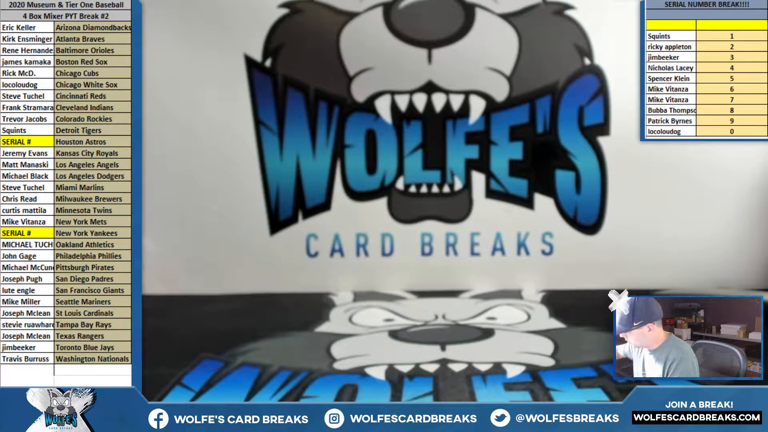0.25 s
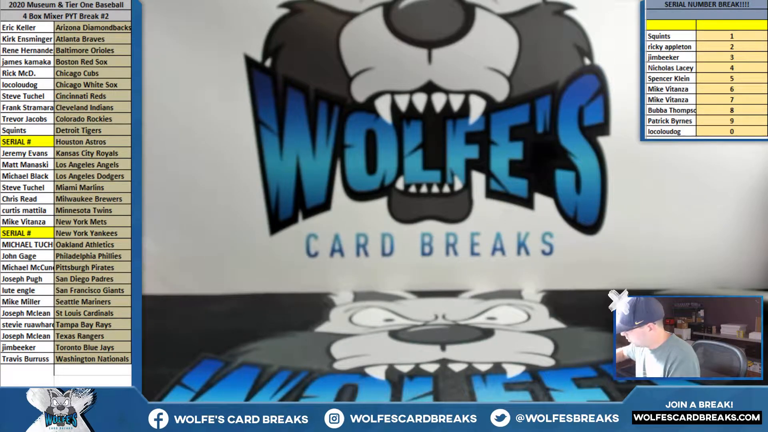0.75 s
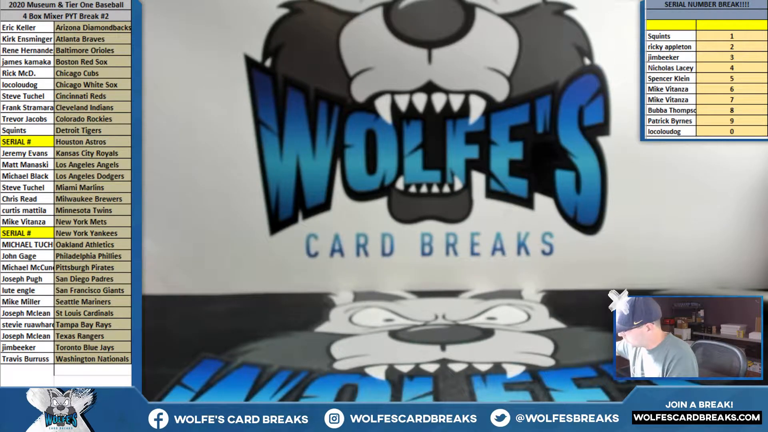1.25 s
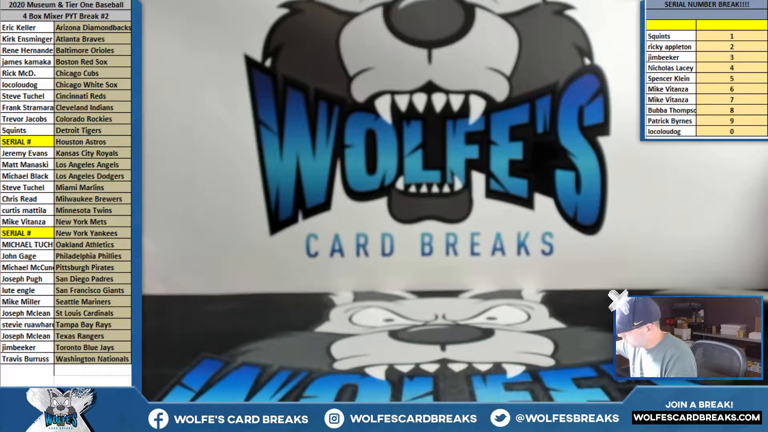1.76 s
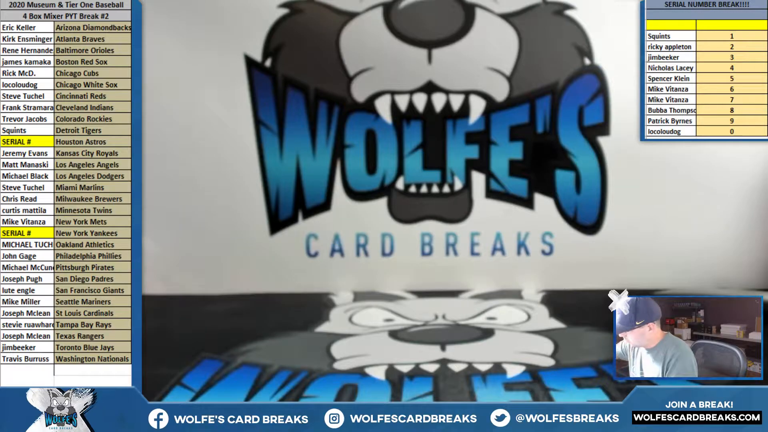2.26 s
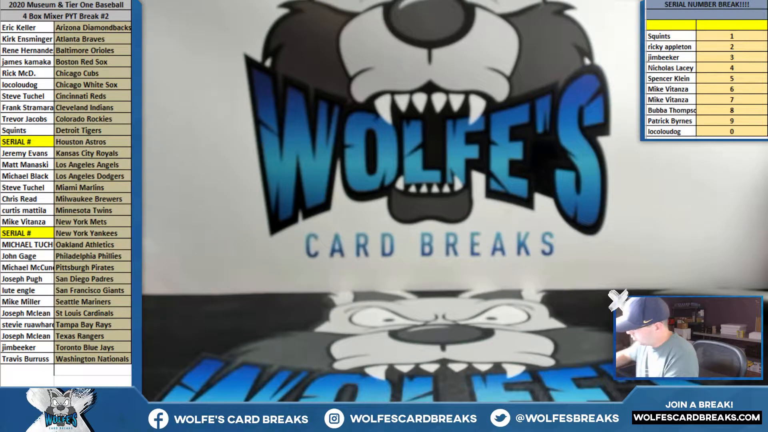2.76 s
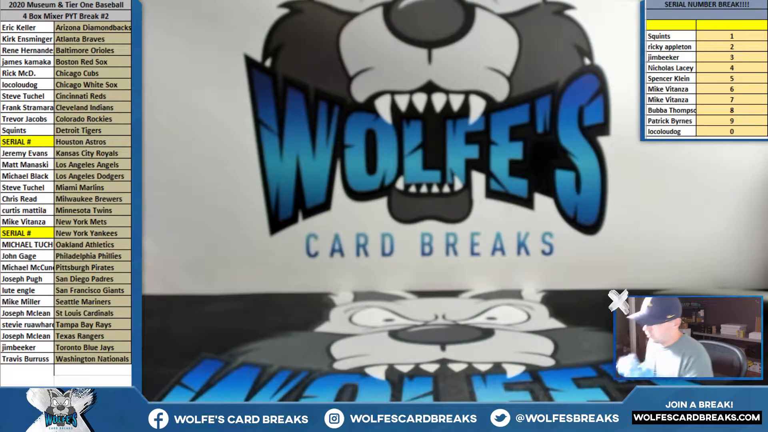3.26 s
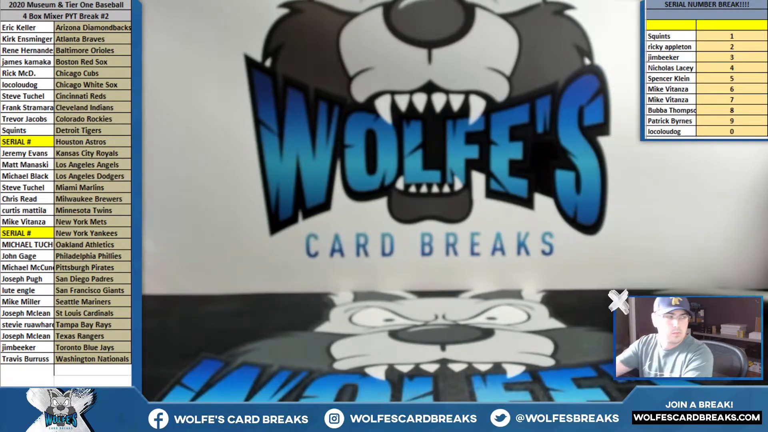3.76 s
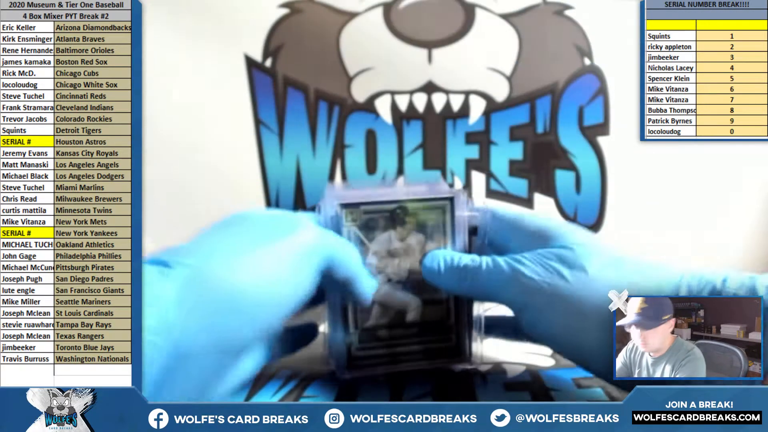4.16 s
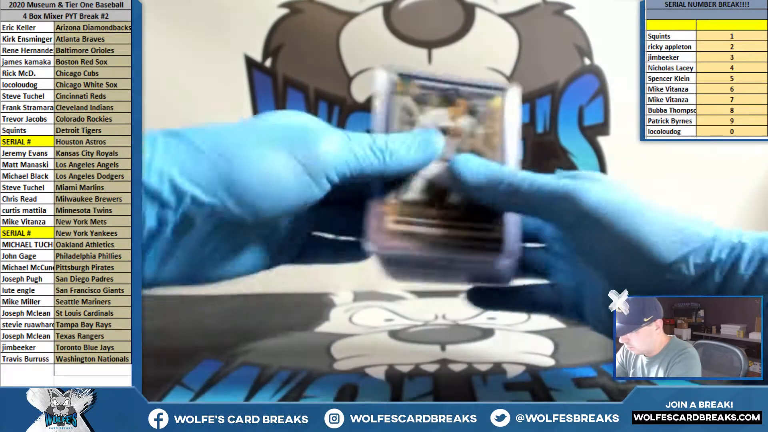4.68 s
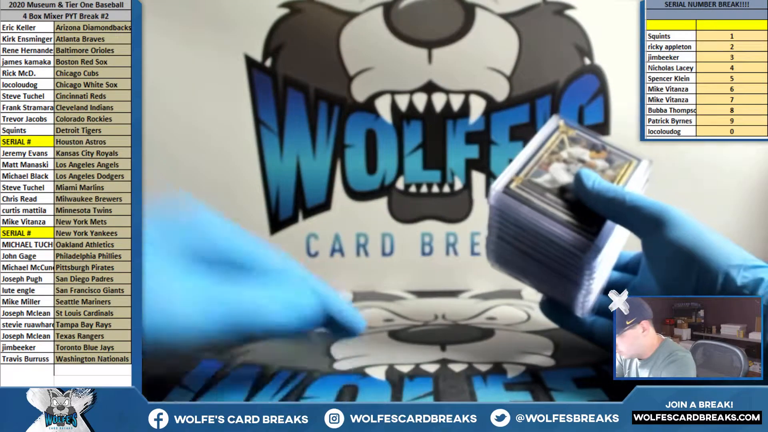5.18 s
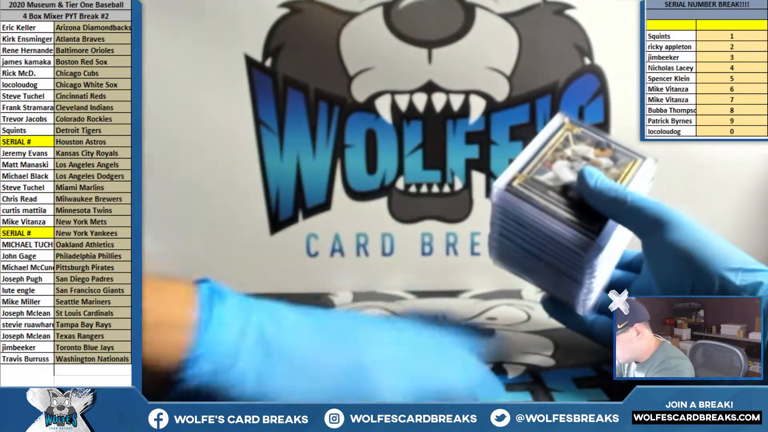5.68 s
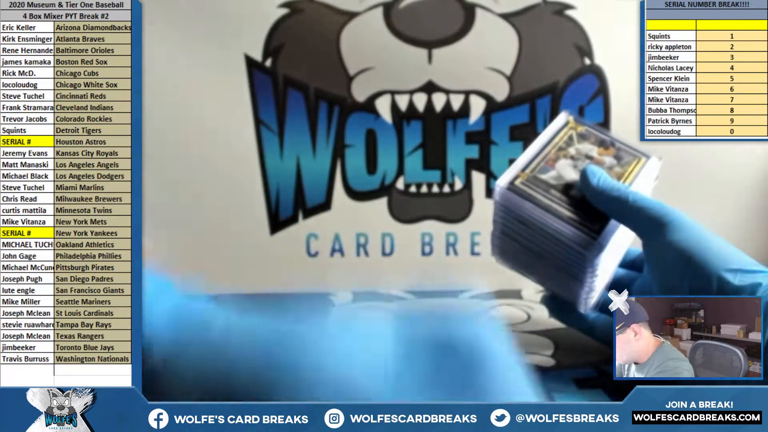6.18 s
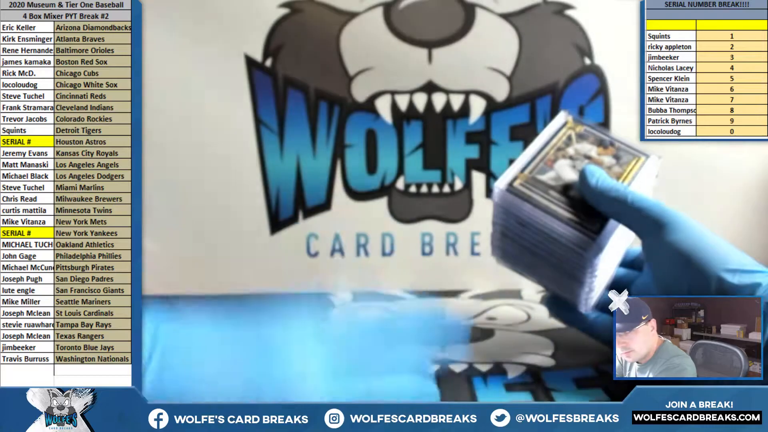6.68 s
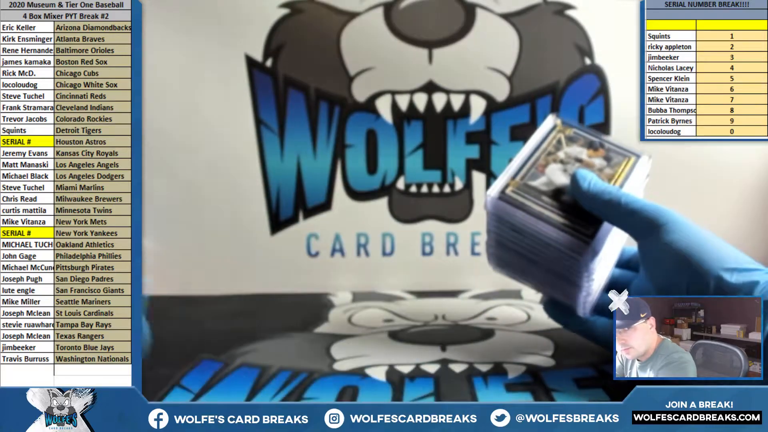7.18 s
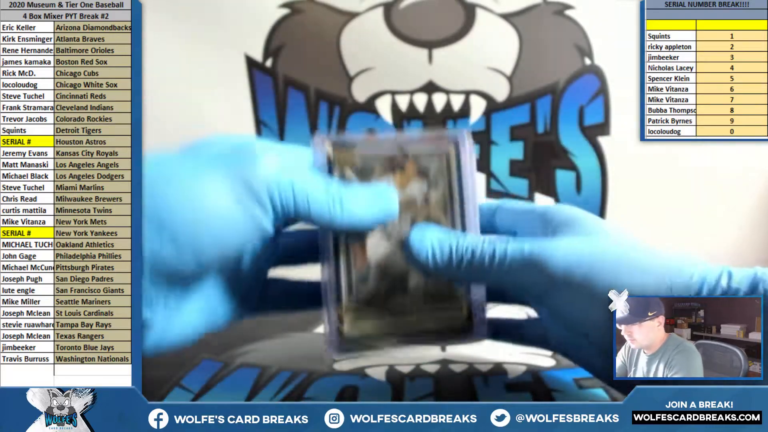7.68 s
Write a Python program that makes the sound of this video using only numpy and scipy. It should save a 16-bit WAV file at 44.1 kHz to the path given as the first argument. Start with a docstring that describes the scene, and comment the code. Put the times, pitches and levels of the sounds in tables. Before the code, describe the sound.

Over a faint fan hum, gloves rustle softly and stiff plastic card holders clack against a desk in a few scattered knocks. A card slips from its sleeve with a short rising zip. Later the holders are laid down one after another and slid across a cloth mat, each with a hiss, a click and a thump, while the desk rumbles deeply. The microphone stands close by in a small room.

```python
"""A faint fan hum and the soft rustle of gloves come first; then plastic card holders clack on a desk.
The stiff holders ring as they are knocked together and stacked, and a small room echoes each clack.
A card leaves its sleeve with a short rising zip. Later the holders are laid down one by one and slid
aside, hissing on a cloth mat. Blows thump the desk top, and the whole desk sways on its legs with a
deep rumble. Everything is heard up close, through a microphone standing on the desk."""
import sys
import numpy as np
from scipy import signal
from scipy.fft import rfft, irfft, next_fast_len
from scipy.io import wavfile
from scipy.ndimage import uniform_filter1d, map_coordinates

SR = 44100
rng = np.random.default_rng(int(sys.argv[2]) if len(sys.argv) > 2 else 0)


def log_audio(samples):
    """Write samples as a 16-bit WAV file to the path given in sys.argv[1]."""
    # one column per channel
    frames = np.atleast_2d(samples).T
    # limit to full scale, then quantise
    limited = np.clip(frames, -1, 1)
    pcm = np.round(limited * 32767).astype(np.int16)
    wavfile.write(sys.argv[1], SR, pcm)


N = 350133

# Tone of the room's air noise: pitch_hz, level_db
AIR_TONE = [(21, -38), (35, -12.5), (77, -14), (95, -24), (227, -15), (258, -25), (454, -25.5), (930, -38),
            (1270, -37), (1370, -40.5), (1810, -40.5), (2400, -66), (16000, -54)]
# Steady rubbing of gloves and sleeves: time_s, fine_db, dull_db
RUSTLE_LEVELS = [(0.0, -90.5, -83.5), (0.99, -85, -82), (1.3, -82, -78.5), (1.9, -82, -80),
                 (2.33, -79, -78), (2.44, -64, -56), (2.6, -66, -60), (2.75, -71, -68), (2.85, -78, -72),
                 (3.45, -76.5, -80), (3.7, -85, -82.5), (3.98, -83.5, -79), (4.2, -70, -67.5),
                 (4.6, -73, -78), (5.2, -76.5, -79), (6.0, -75.5, -78), (6.4, -72, -72.5),
                 (7.25, -75, -76.5), (7.54, -76.5, -78.5), (7.94, -67, -63.5)]
# Soft scuffs of a glove or sleeve: start_s, fade_s, fine_db, dull_db
# (every fade_s is the time a sound takes to drop by 60 dB)
SCUFFS = [(0.463, 0.23, -67.5, -58.5), (0.622, 0.18, -68.5, -99), (0.913, 0.069, -71, -87),
          (1.15, 0.38, -60, -60), (1.22, 0.13, -67, -65), (1.47, 0.44, -77, -72.5),
          (2.355, 0.095, -56.5, -55), (2.455, 0.31, -60, -65), (3.35, 0.095, -66, -87),
          (4.018, 0.23, -66, -70), (4.15, 0.18, -64, -53.5), (4.38, 0.67, -70, -70),
          (5.42, 0.073, -59.5, -78), (6.52, 0.22, -79, -91), (7.433, 0.1, -58, -61)]
# Tone of the fine rustle of soft plastic sleeves: pitch_hz, level_db
FINE_RUSTLE_TONE = [(1760, -29), (3000, -8), (5000, -5), (7500, -2), (10000, -9), (13500, -10),
                    (15800, -15)]
# Tone of the dull rustle: pitch_hz, level_db
DULL_RUSTLE_TONE = [(400, -50), (700, -13), (1050, -3.5), (1300, -1.5), (1840, 0.5), (2700, -1),
                    (3700, -6.5), (6000, -14), (10000, -82)]
# The rising note of a card leaving its sleeve: time_s, pitch_hz, level_db
ZIP_PATH = [(2.39, 2100, -75), (2.43, 3190, -62), (2.47, 5160, -59), (2.505, 6300, -57), (2.53, 7000, -78)]
# Pushes that set the desk swaying: start_s, rocking_db, shaking_db
DESK_PUSHES = [(0.0, -51, -69.5), (0.3, -56.5, -78), (0.72, -74, -78), (0.97, -57, -75), (1.5, -55, -68.5),
               (2.02, -61, -58.5), (2.3, -51.5, -58), (4.05, -59, -57), (4.36, -53, -57.5),
               (4.981, -46.5, -54), (5.241, -33, -49.5), (5.6, -41, -45), (5.75, -35.5, -46.5),
               (5.98, -33.5, -43.5), (6.32, -34, -43), (6.76, -29, -42.5), (6.97, -33.5, -43.5),
               (7.45, -41, -48), (7.76, -46, -43.5)]
# A holder slides over the mat: start_s, length_s, level_db
SLIDES = [(4.824, 0.17, -45.5), (5.216, 0.17, -47), (5.574, 0.22, -47), (5.948, 0.22, -46),
          (6.29, 0.24, -48.5), (6.607, 0.22, -48), (6.94, 0.19, -47.5)]
# Tone of a slide's bright hiss: pitch_hz, level_db
HISS_TONE = [(1500, -34), (2500, -4), (4400, -4.5), (5300, -6), (6800, -1), (7700, -1), (11300, -8),
             (13600, -5), (14700, -10), (15800, -13)]
# Tone of a slide's main scrape: pitch_hz, level_db
SCRAPE_TONE = [(900, -5), (1500, 1.5), (2000, 1), (2700, -8.5), (3700, -2.5), (6000, -13), (10000, -55)]
# Tone of the shorter scrape at the start of a slide: pitch_hz, level_db
SHORT_SCRAPE_TONE = [(500, -43), (900, -16.5), (1400, -5.5), (1900, 10.5), (3000, 1)]
# Notes the desk top rings at with no hand on it: pitch_hz, level_db, fade_s
DESK_NOTES = [(87.86, -3, 1), (98, 7.5, 0.14), (111.7, 3, 0.4), (126.5, 8.5, 0.075), (144, 2, 0.49),
              (162, 3, 0.14), (188.1, 2, 0.2), (220.8, -2, 0.36), (251.3, -3, 0.48), (279, 1, 0.33),
              (356.2, 2.5, 0.25), (395, 9, 0.12), (449.5, -3.5, 0.29), (542.5, 3, 0.16), (655, -3.5, 0.14)]
# Blows on the desk top: start_s, level_db, pitch_hz, hardness_db
THUMPS = [(0.501, -67, 128, -4), (0.974, -40.5, 204, -4), (0.995, -33.5, 169, -3.5),
          (1.039, -34.5, 151, -14), (1.156, -45.5, 137, 5.5), (2.019, -27, 212, -6.5),
          (2.049, -25, 193, -10), (2.296, -39.5, 154, -20), (2.325, -44, 143, -29), (2.351, -42, 144, -23),
          (2.386, -44.5, 142, -17), (2.458, -43.5, 84, 3), (2.777, -44.5, 127, -10), (3.126, -50.5, 85, -9),
          (3.375, -54, 137, -5), (4.043, -38, 140, -29), (4.049, -28.5, 173, -12.5), (4.073, -30, 98, -19),
          (4.134, -32, 208, -10), (4.151, -34, 103, 2), (4.173, -32.5, 122, -9), (4.194, -37.5, 95.6, -4.5),
          (4.238, -37.5, 139, -15.5), (4.367, -44, 107, -4.5), (4.839, -40, 113, -16.5),
          (4.869, -40, 101, -27), (4.979, -46, 90, -23), (5.233, -29.5, 105, -24), (5.583, -27.5, 184, -22),
          (5.605, -28.5, 118, -17.5), (5.642, -41, 96, -22), (5.744, -39, 140, -18), (5.956, -33, 146, -12),
          (5.975, -27.5, 113, -28), (6.111, -32.5, 100, -21.5), (6.312, -30, 133, -12.5),
          (6.359, -37, 87, -27), (6.46, -43.5, 86.1, -26), (6.623, -22.5, 104.5, -13.5),
          (6.743, -30.5, 85.5, -25.5), (6.948, -28.5, 115.6, -13), (6.976, -35.5, 86.1, -15),
          (7.072, -34, 89, -18), (7.109, -41, 140, -20), (7.754, -30, 104, -36), (7.816, -30, 133, -7),
          (7.826, -30.5, 131, -8.5), (7.837, -26, 114, -16.5), (7.884, -37, 89, -23)]
# How long the room echoes, from low to high: pitch_hz, fade_s
ROOM_FADE = [(500, 0.46), (1500, 0.26), (4000, 0.28), (8000, 0.22), (15000, 0.15)]
# Tone of the treble in a plastic crack: pitch_hz, level_db
CRACK_TONE = [(500, -42), (2500, -1), (6500, 1), (10000, -5.5), (16000, -9.5)]
# Notes a stack of holders rings at: pitch_hz, width_hz, level_db
HOLDER_NOTES = [(914, 220, 9.5), (1225, 61, 12.5), (1405, 100, 2), (1615, 110, 7), (1822, 120, -9),
                (2156, 150, 3), (2310, 210, -3.5), (2610, 450, 3.5), (3150, 420, -26.5), (3820, 450, -1.5),
                (4800, 510, -34), (5650, 160, 3.5), (7750, 850, -9)]
# Holder edges knock together: start_s, level_db, pitch_hz, treble_db
CLACKS = [(0.97, -35, 1300, -11), (0.9744, -22.5, 1480, -11.5), (0.9801, -20, 1570, -10),
          (1.0019, -25.5, 1690, -11.5), (1.15, -35, 2170, -39), (1.1735, -35, 1470, -28),
          (1.2253, -39.5, 1670, -19), (2.0149, -33, 2770, -16), (2.0204, -24.5, 2680, -13.5),
          (2.0271, -23.5, 1250, -12.5), (2.038, -29.5, 5900, 0), (2.3086, -51.5, 1360, -10.5),
          (2.4559, -31, 2070, -39), (2.4654, -33, 1850, -23), (2.781, -48.5, 1000, -21),
          (2.9592, -49.5, 1500, -3), (3.1261, -51.5, 2700, -9), (3.376, -45, 1000, -5),
          (3.381, -47.5, 5040, -11), (3.6445, -56, 1920, -8), (4.048, -30, 2100, -22.5),
          (4.0757, -41, 1220, -21), (4.16, -48, 1580, -23), (4.1692, -35.5, 2170, -11),
          (4.1892, -48, 1540, -18), (4.216, -47.5, 3320, -28), (4.368, -23.5, 2700, -14),
          (4.562, -50.5, 3640, -13), (4.715, -47.5, 7100, -6), (4.831, -50, 2190, -29),
          (4.8423, -39.5, 1640, -18), (5.0783, -49, 1280, -2), (5.2212, -40.5, 1730, -15),
          (5.232, -29, 2070, -13), (5.5734, -43, 1780, -28), (5.5868, -28, 1800, -14),
          (5.649, -36.5, 1980, -21), (5.947, -46, 1920, -25), (5.9611, -35.5, 1960, -18.5),
          (6.309, -44, 2400, -23), (6.541, -48, 3000, -25), (6.6148, -46, 1420, -28),
          (6.6243, -28.5, 1600, -39), (6.864, -50, 3000, -31), (6.9494, -33.5, 1530, -23),
          (6.9529, -31, 1760, -30), (6.959, -37, 1580, -28), (7.0745, -41, 1600, -24.5),
          (7.4448, -48, 4500, -10), (7.486, -46, 4300, -23), (7.594, -51, 1630, -6),
          (7.6506, -50, 1580, -10), (7.7526, -44, 2360, -7), (7.777, -43, 1250, -11),
          (7.8162, -40.5, 1820, -33), (7.8247, -40.5, 2000, -26), (7.9013, -36.5, 1780, -17),
          (7.907, -38, 1700, -15)]

ROCK_HZ, LOW_ROCK_HZ, SHAKE_HZ = 26.5, 20, 68
SWAY_LOSS_DB_PER_S, SWAY_BUILD_S = (8, 3), 0.06  # the two losses: rocking, shaking
TICKS_PER_S, TICK_FADE_S = 18, 0.007
HAND_DAMPING = 0.71  # share of the desk's ring time left under a resting hand
STACK_NEAR_S = 4.0  # from here on the stack is gripped and close to the microphone
ROOM_FAR_DB, ROOM_NEAR_DB = -22.5, -32
CHATTER_LOOSE, CHATTER_GRIPPED = 0.42, 0.22
TOP_HZ = 15740


def amp(db):
    """Turn decibels into a gain to multiply by."""
    return 10 ** (np.asarray(db) / 20)


def unit(x):
    """Scale x to an average power of 1."""
    return x / np.sqrt(np.mean(x ** 2) + 1e-20)


def along(points, hz):
    """Read a table of pitch_hz, value at any pitch, blending between its rows."""
    pitches, values = np.transpose(points)
    return np.interp(np.log(hz + 1), np.log(pitches + 1), values)


def curves(rows, outside=None):
    """Turn each column after the time into one value per sample."""
    times, *columns = np.transpose(rows)
    return [np.interp(np.arange(N) / SR, times, column, outside, outside) for column in columns]


def wobble(rate):
    """A smooth curve through `rate` random values a second."""
    return map_coordinates(rng.standard_normal(int(N * rate / SR) + 4), [np.arange(N) * rate / SR])


def rough_noise(tone, grain_db, patchy_db):
    """Uneven noise, like the many tiny slips of rubbing, shaped by a tone table."""
    slips = rng.standard_normal(N) * amp(grain_db * wobble(700))
    bands = signal.stft(slips, nperseg=256)[2]
    patches = uniform_filter1d(uniform_filter1d(rng.standard_normal(bands.shape), 5, 0), 8, 1)
    slips = signal.istft(bands * amp(patchy_db * unit(patches)), nperseg=256)[1][:N]
    size = next_fast_len(N + 8192)
    gain = amp(along(tone, np.fft.rfftfreq(size, 1 / SR)))
    return unit(irfft(rfft(slips, size) * gain, size)[:N])


def air_and_fan():
    """Low air noise and the fuzzy note of a fan."""
    air = amp(-63) * rough_noise(AIR_TONE, grain_db=0.5, patchy_db=0.5)
    fan = amp(-70 + 1.8 * wobble(14)) * np.sin(2 * np.pi * 225 * np.arange(N) / SR + 0.7 * wobble(10))
    return air + fan


def rustle():
    """Gloves and sleeves rub faintly and flare up in each scuff; creases tick as they give way."""
    fine, dull = amp(curves(RUSTLE_LEVELS))
    for start_s, fade_s, fine_db, dull_db in SCUFFS:
        age_s = np.clip(np.arange(N) / SR - start_s, 0, None)
        flare = (1 - np.exp(-age_s / 0.0073)) * amp(-60 * age_s / fade_s)
        fine += amp(fine_db) * flare
        dull += amp(dull_db) * flare
    ticks = (rng.random(N) < TICKS_PER_S / SR) * amp(4 + 5 * rng.standard_normal(N))
    tick_fade = amp(-60 * np.arange(SR // 20) / SR / TICK_FADE_S)
    creases = 1 + signal.fftconvolve(ticks, tick_fade)[:N]
    fine *= amp(2.4 * wobble(18)) * creases * rough_noise(FINE_RUSTLE_TONE, grain_db=2.5, patchy_db=0.8)
    dull *= amp(1.5 * wobble(15)) * rough_noise(DULL_RUSTLE_TONE, grain_db=2, patchy_db=1.2)
    return fine + dull


def card_zip():
    """A card rubs out of its sleeve; the air pocket shrinks, so its noisy note rises."""
    pitch_hz = curves(ZIP_PATH)[0]
    level_db = curves(ZIP_PATH, outside=-200)[1]
    return amp(level_db) * wobble(500) * np.sin(2 * np.pi * np.cumsum(pitch_hz) / SR)


def desk_sway():
    """Each push sets the whole desk rocking and shaking: deep, wavering notes that slowly sink."""
    t = np.arange(N) / SR
    start_s, *push_db = np.transpose(DESK_PUSHES)
    latest = np.clip(np.searchsorted(start_s, t, "right") - 1, 0, None)
    age_s = t - start_s[latest]
    rock, shake = [uniform_filter1d(amp(db[latest] - loss * age_s), int(SWAY_BUILD_S * SR))
                   for db, loss in zip(push_db, SWAY_LOSS_DB_PER_S)]
    note = lambda hz: np.sqrt(2) * np.sin(2 * np.pi * hz * t + 0.86 * wobble(5))
    low_rock = amp(-9.5 + 3 * wobble(1.505)) * note(LOW_ROCK_HZ)  # throbs against the rocking note
    return rock * (note(ROCK_HZ) + low_rock) + shake * note(SHAKE_HZ)


def holder_slides():
    """Plastic on cloth: a hiss that grows with the hand's speed, and two scrapes early in the stroke."""
    hiss, scrape, short_scrape = np.zeros((3, N))
    for start_s, length_s, level_db in SLIDES:
        progress = np.clip((np.arange(N) / SR - start_s) / length_s, 0, 1)
        speed = np.abs(np.sin(np.pi * progress ** 0.72)) * (progress < 1)  # quick start, slower stop
        loudness = speed ** 1.55
        hiss += amp(level_db) * loudness
        scrape += amp(level_db - 1.5 - 17.5 * progress) * np.sqrt(loudness)
        short_scrape += amp(level_db - 10.5 - 26.5 * progress) * np.sqrt(loudness)
    linger = np.exp(-1 / (0.0092 * SR))  # the sound hangs briefly in the room
    hiss, scrape = np.sqrt(signal.lfilter([1 - linger], [1, -linger], np.array([hiss, scrape]) ** 2))
    hiss *= amp(1.5 * wobble(40)) * rough_noise(HISS_TONE, grain_db=2.6, patchy_db=2)
    scrape *= rough_noise(SCRAPE_TONE, grain_db=2.4, patchy_db=2.4)
    short_scrape *= rough_noise(SHORT_SCRAPE_TONE, grain_db=2, patchy_db=2)
    return hiss + scrape + short_scrape


def desk_thumps():
    """A blow rings the desk notes near its pitch; a hard one also reaches the higher notes."""
    out, t = np.zeros(N + SR), np.arange(SR * 3 // 4) / SR
    hz, note_db, fade_s = np.transpose(DESK_NOTES)[:, :, None]
    fade_db = -60 * t / (fade_s * HAND_DAMPING)
    build_up = 1 - np.exp(-t * hz / 0.42)  # takes about one cycle
    for start_s, level_db, pitch_hz, hardness_db in THUMPS:
        level_jitter, phase_jitter = rng.standard_normal((2, len(DESK_NOTES), 1))
        share = amp(hardness_db - 4) * (hz > 200) + np.exp(-(np.log2(hz / pitch_hz) / 0.5) ** 2)
        waves = np.sin(2 * np.pi * hz * t + 0.82 * phase_jitter)
        ring = (share * amp(note_db + 2.1 * level_jitter + fade_db) * waves * build_up).sum(0)
        out[round(start_s * SR):][:len(t)] += amp(level_db + 1) * ring / np.sqrt(np.sum(share ** 2))
    return out[:N]


def room_echo(size):
    """The small room's answer to a clack: noise whose high pitches die sooner than its low ones."""
    hz, t, bands = signal.stft(rng.standard_normal(size), SR, nperseg=128)
    fade = amp(-60 * t / along(ROOM_FADE, hz)[:, None])
    echo = signal.istft(bands * fade, SR, nperseg=128)[1][:size]
    return echo * (1 - np.exp(-np.arange(size) / SR / 0.0016))


def holder_clacks():
    """Edges hit and chatter; the short crack rings the holder notes near its pitch, and the room echoes."""
    out, size = np.zeros(N + SR), SR // 2
    t, hz = np.arange(size) / SR, np.fft.rfftfreq(size, 1 / SR)
    note_hz, width_hz, note_db = np.transpose(HOLDER_NOTES)[:, :, None]
    notes = amp(note_db) * 1j * hz * width_hz / (note_hz ** 2 - hz ** 2 + 1j * hz * width_hz)
    notes *= (-1) ** np.arange(len(HOLDER_NOTES))[:, None]  # neighbours swing opposite ways
    lead = 64  # samples of space ahead of the hit
    for start_s, level_db, pitch_hz, treble_db in CLACKS:
        far = start_s < STACK_NEAR_S
        share = 0.17 + np.exp(-(np.log2(note_hz / pitch_hz) / 0.38) ** 2)
        ring = (share * amp(rng.normal(0, 2.43, share.shape)) * notes).sum(0)
        damped_face = 0.79 * (1j * hz * pitch_hz / (pitch_hz ** 2 - hz ** 2 + 1.5j * hz * pitch_hz)) ** 2
        treble = amp(treble_db + along(CRACK_TONE, hz))
        tone = ring / np.abs(ring).max() + damped_face + treble
        chatter = CHATTER_LOOSE if far else CHATTER_GRIPPED
        crack = chatter * amp(-60 * t / 0.013) * rng.standard_normal(size)
        crack[0] = 1  # the first contact
        direct_tone = tone - 0.3 * treble  # some treble arrives only as echo
        direct = irfft(rfft(np.roll(crack, lead)) * direct_tone, size)
        echo = irfft(rfft(np.roll(room_echo(size), lead)) * tone, size)
        # A clack turned away from the microphone has less treble and more echo.
        room_db = (ROOM_FAR_DB if far else ROOM_NEAR_DB) - 0.32 * treble_db
        clack = direct / np.abs(direct).max() + amp(room_db) * echo / np.sqrt(np.mean(np.abs(tone) ** 2))
        out[round(start_s * SR) - lead:][:size] += amp(level_db) * clack
    return out[:N]


def scene():
    """Add all the sounds into one channel."""
    handling = holder_clacks() + desk_thumps() + desk_sway() + holder_slides() + card_zip() + rustle()
    return (handling + air_and_fan())[None]


def record(dry):
    """Cut away everything above TOP_HZ."""
    size = next_fast_len(N + 8192)
    return irfft(rfft(dry, size) * (np.fft.rfftfreq(size, 1 / SR) < TOP_HZ), size)[:, :N]


dry = scene()
out = record(dry)
log_audio(out)
```